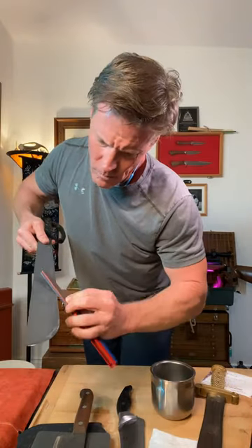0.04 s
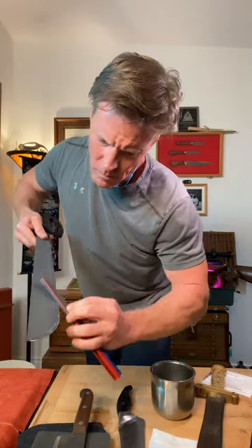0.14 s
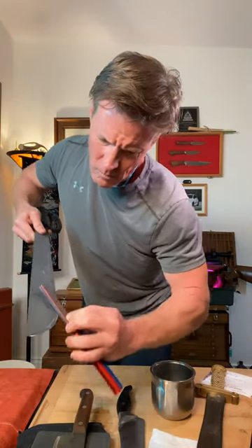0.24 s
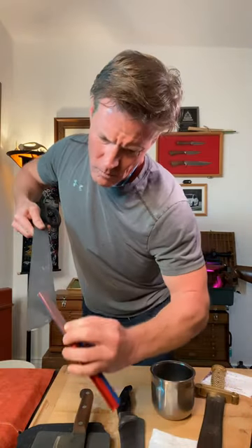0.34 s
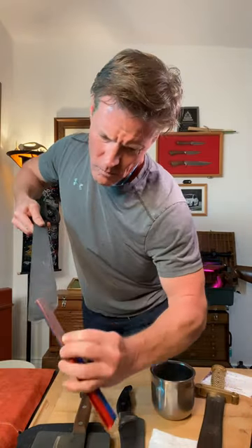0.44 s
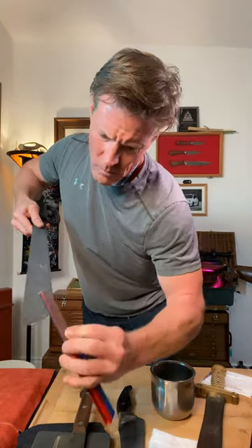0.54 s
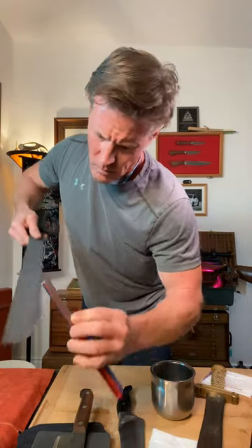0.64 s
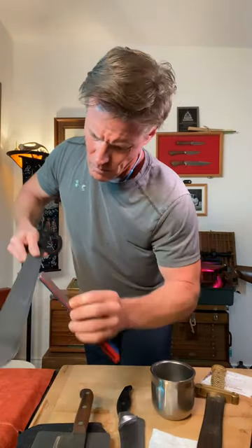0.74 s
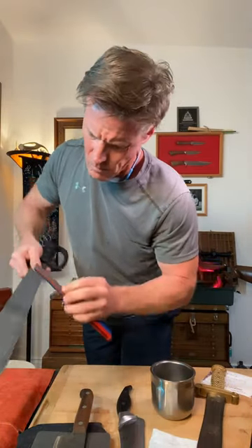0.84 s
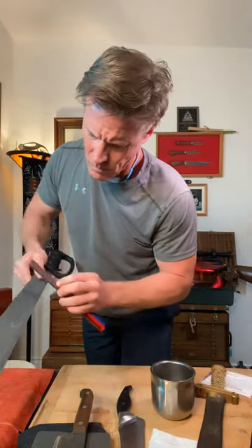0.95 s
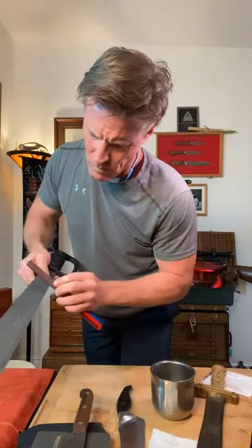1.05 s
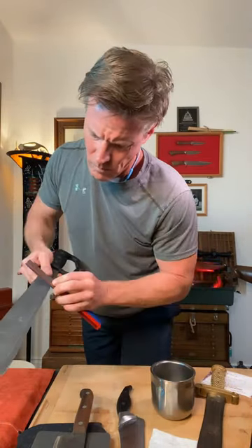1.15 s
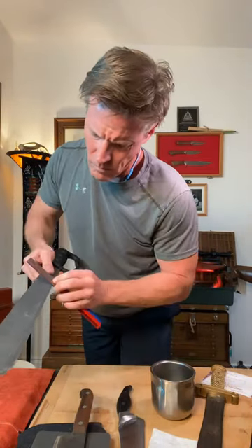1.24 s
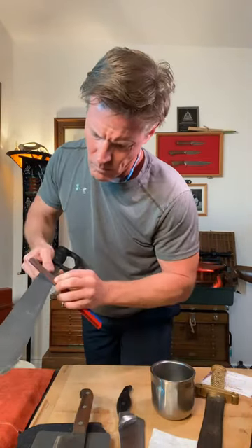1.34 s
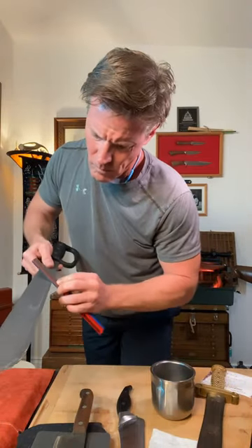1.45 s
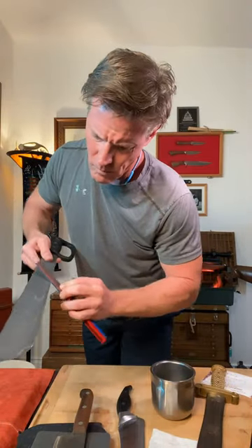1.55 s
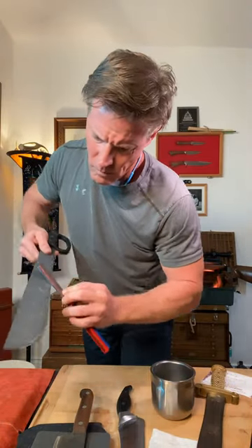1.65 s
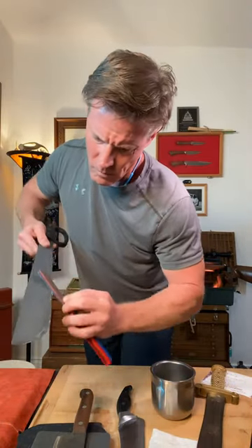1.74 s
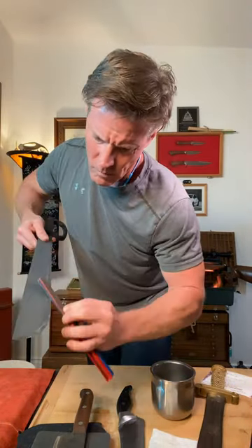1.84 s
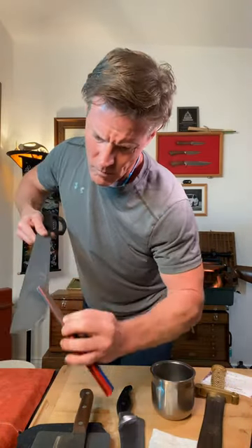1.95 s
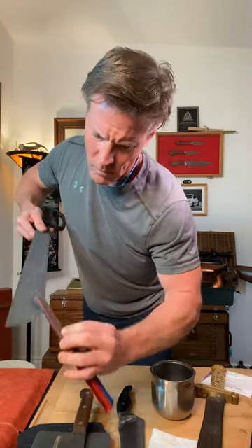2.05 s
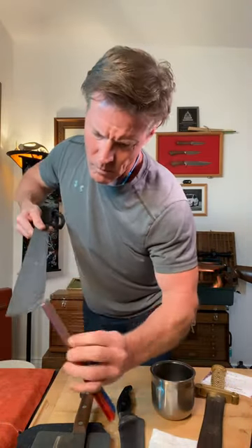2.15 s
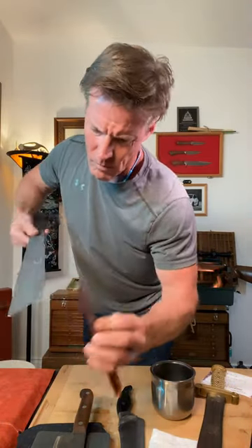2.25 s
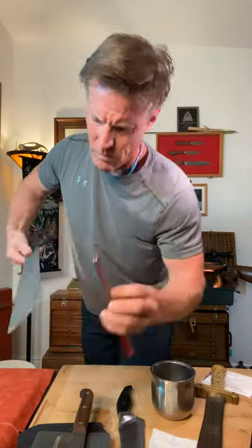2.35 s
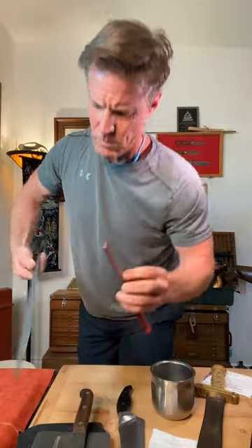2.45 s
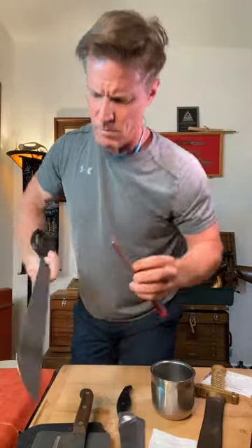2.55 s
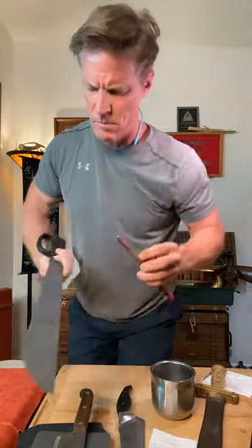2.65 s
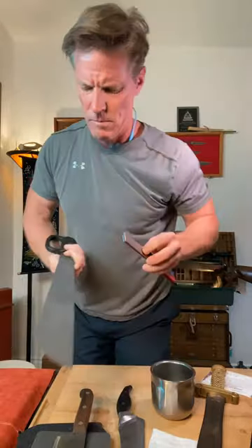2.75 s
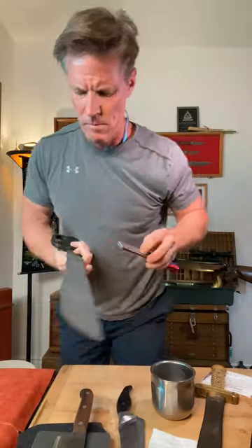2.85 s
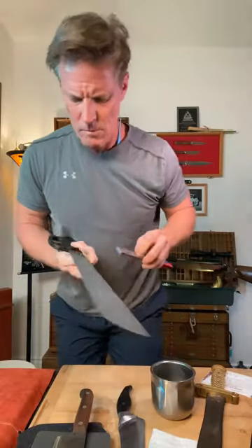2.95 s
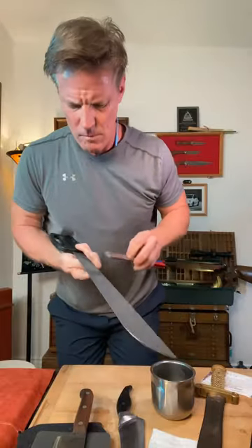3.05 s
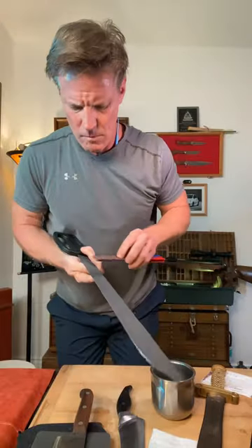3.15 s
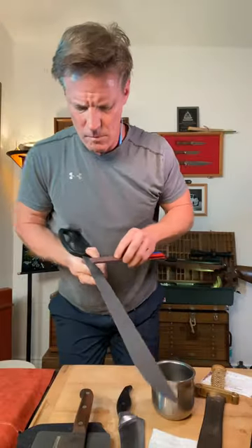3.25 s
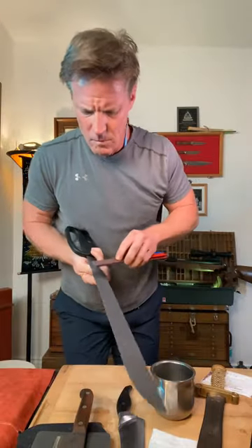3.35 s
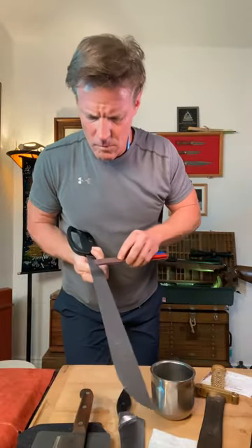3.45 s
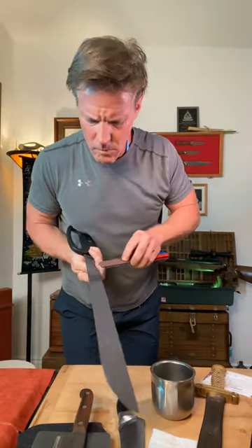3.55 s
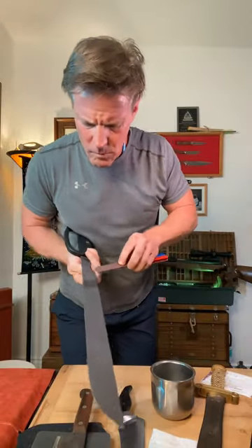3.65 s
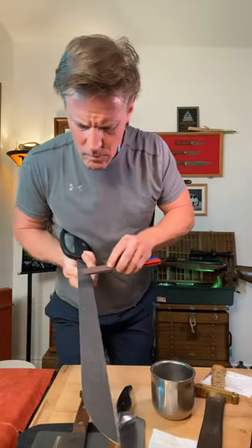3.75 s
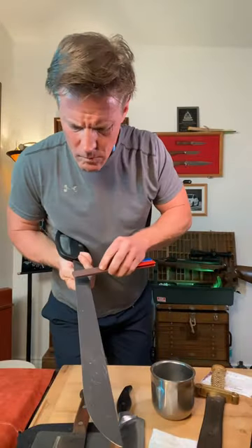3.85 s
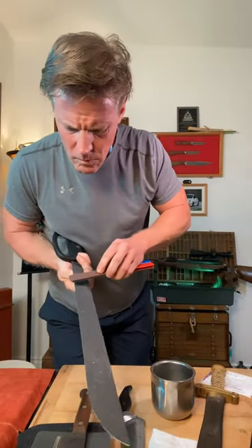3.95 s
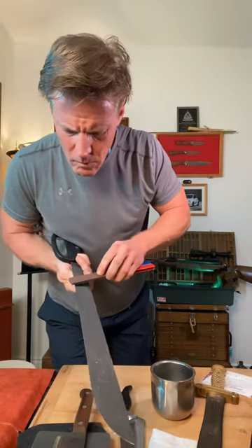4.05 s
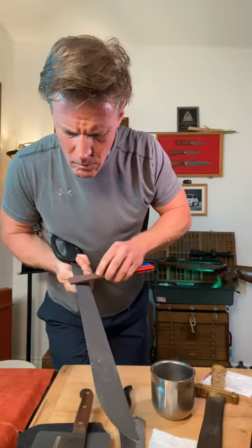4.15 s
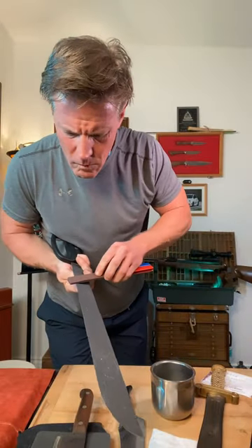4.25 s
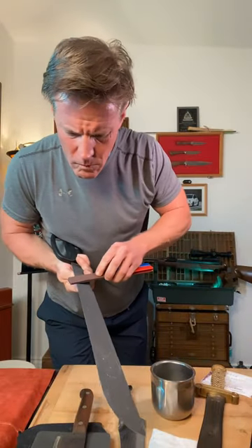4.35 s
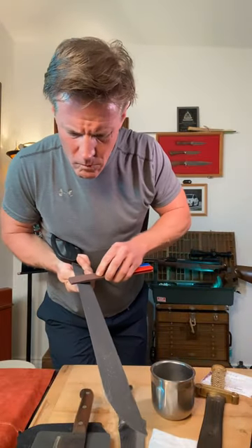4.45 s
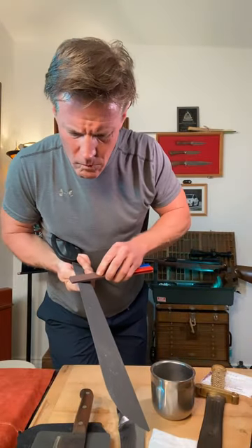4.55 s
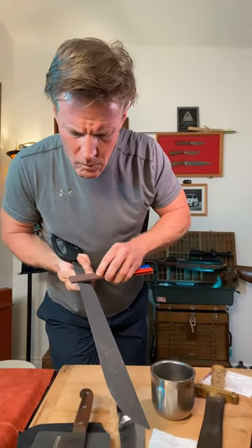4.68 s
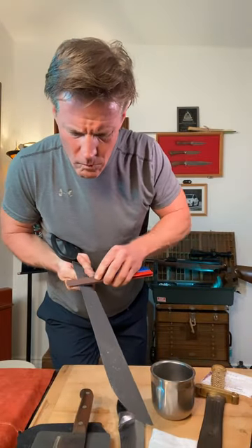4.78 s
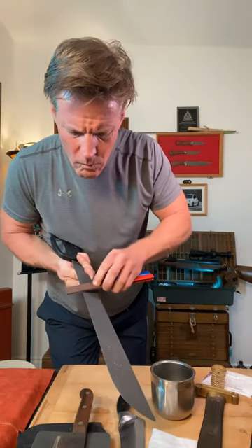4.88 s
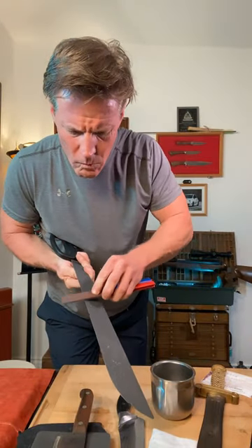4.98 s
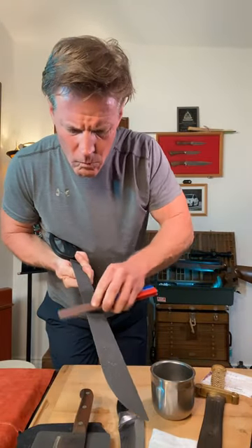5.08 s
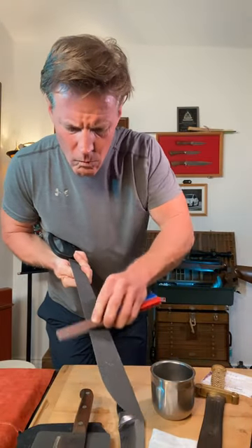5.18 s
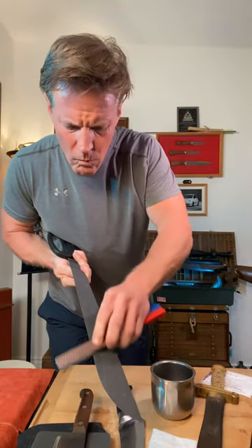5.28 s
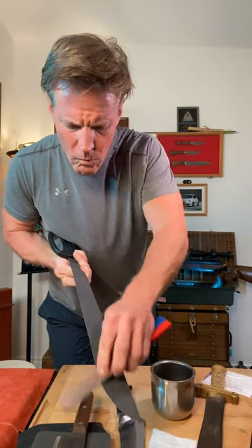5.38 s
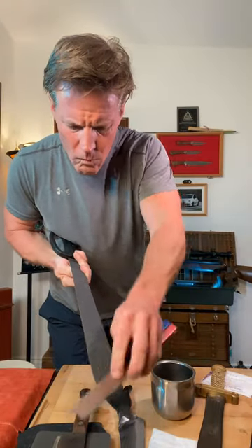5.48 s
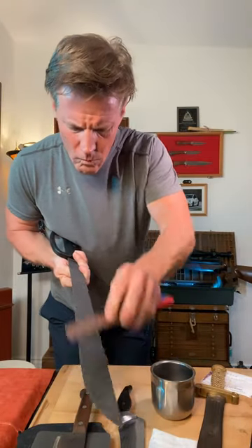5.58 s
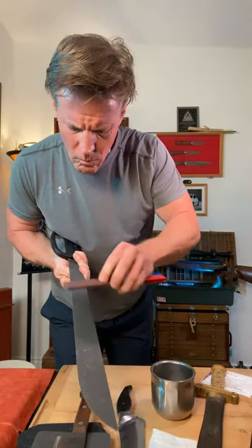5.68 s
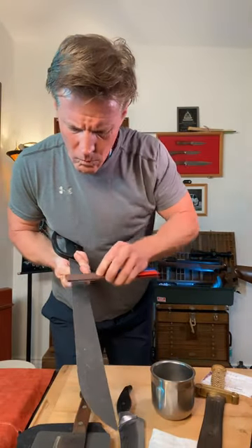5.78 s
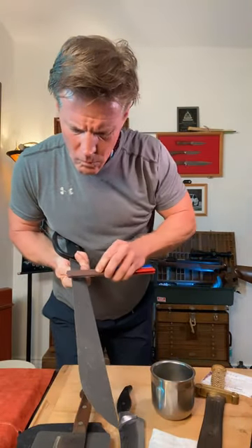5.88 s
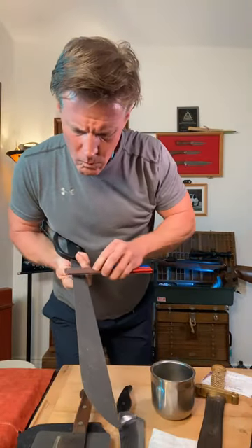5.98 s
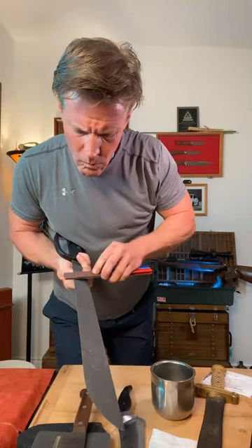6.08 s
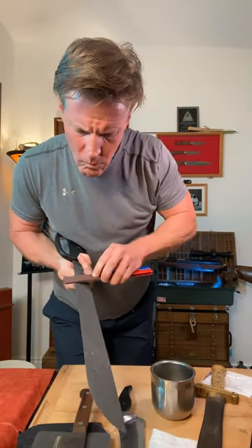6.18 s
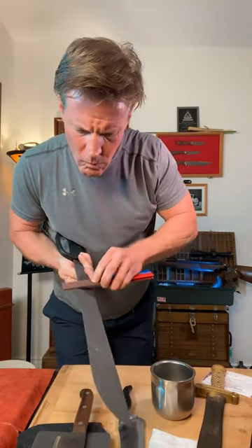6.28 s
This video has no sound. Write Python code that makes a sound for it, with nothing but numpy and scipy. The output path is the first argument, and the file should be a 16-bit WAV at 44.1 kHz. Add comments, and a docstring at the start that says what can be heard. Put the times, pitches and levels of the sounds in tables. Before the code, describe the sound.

Close to one microphone in a small room, a gritty stone rasps along a long steel blade, already mid-stroke. It runs off the tip with a faint high ring, then lands with a crack for a louder second stroke. The shirt rustles and the grip bumps softly as the blade is turned. A sharp knock follows, then a slower scrape that rings off, another hard knock, and the start of a last stroke.

```python
"""A diamond sharpening stone rasps along a long steel blade in a small room, close to one microphone.
We come in at mid-blade on the first of four strokes and leave early in the fourth.
Random grains drive the scrape and the blade's resonances; the stone lands with noise cracks and ringing
knocks, and decaying sines ring on when it runs off the tip. Between the two sets the blade is turned over,
with a filtered-noise rustle of shirt and soft bumps of the grip. Noise echoes and room tone lie behind."""
import sys
import numpy as np
from scipy import signal
from scipy.fft import rfft, irfft
from scipy.io import wavfile
from scipy.ndimage import map_coordinates

SR = 44100
rng = np.random.default_rng(int(sys.argv[2]) if len(sys.argv) > 2 else 0)


def bounce(signal):
    """Save signal as a 16-bit WAV file at the path given by the first command-line argument."""
    frames = np.transpose(np.atleast_2d(signal))
    limited = np.clip(frames, -1, 1)
    pcm = np.round(limited * 32767).astype(np.int16)
    wavfile.write(sys.argv[1], SR, pcm)


N = 278712
TIME = np.arange(N) / SR   # s


def from_db(db):
    """Decibels to gain."""
    return 10 ** (np.asarray(db) / 20)


def rms_one(x):
    """Scale to unit power."""
    return x / np.sqrt(np.mean(x ** 2) + 1e-20)


def during(start_s, end_s, rise_s, fall_s):
    """One from start to end, fading outside."""
    return np.clip(np.minimum((TIME - start_s) / rise_s, (end_s - TIME) / fall_s) + 1, 0, 1)


def coloured(x, spectrum):
    """Give a steady signal a spectrum; rms 1."""
    hz, db = np.transpose(spectrum)
    bins_hz = np.maximum(np.arange(N // 2 + 1) * SR / N, 1)
    gain_db = np.interp(np.log(bins_hz), np.log(hz), db, left=-100, right=-100)
    return rms_one(irfft(rfft(x) * from_db(gain_db), N))


def cut(x, hz, kind, order=2):
    """Causal low- or high-pass."""
    sos = signal.butter(order, min(hz, .45 * SR), kind, fs=SR, output="sos")
    return signal.sosfilt(sos, x + 1e-18)


def drift(rate):
    """Smooth chance with a spread of one, drawn afresh at `rate` points per second."""
    return rms_one(np.interp(TIME * rate, np.arange(N), rng.standard_normal(N)))


def ring(x, hz, t60_s):
    """A two-pole resonator: a unit click sets a decaying sine of height 1 ringing."""
    radius, turn = from_db(-60 / (t60_s * SR)), 2 * np.pi * hz / SR
    return signal.lfilter([0, np.sin(turn)], [1, -2 * radius * np.cos(turn), radius * radius], x + 1e-18)


def resonate(x, hz, width_hz):
    """A resonance whose centre may move, by smoothing around a turning phase; rms 1."""
    turn = np.exp(2j * np.pi * np.cumsum(hz * np.ones(N)) / SR)
    smooth = signal.lfilter([1], [1, -np.exp(-np.pi * width_hz / SR)], x / turn)
    return rms_one((smooth * turn).real)


def click(s):
    """A unit impulse at a given time."""
    return 1. * (np.arange(N) == round(s * SR))


# colour of the three parts of the scrape: broad rasp, low growl, high sizzle (hz, level_db)
RASP_COLOUR = [(1530, -40.5), (2600, -18), (3630, -3.5), (3910, -5.5), (4500, -2.5), (4890, -5), (5920, 1),
               (6740, 0.5), (7800, 2.5), (10500, -18), (13600, -49.5), (22000, -120)]
GROWL_COLOUR = [(240, -50.5), (400, -25), (571, -15), (710, -17), (1170, -9), (1410, -7.5), (1830, -4.5),
                (2280, -2), (3200, -6.5), (4160, -28), (7040, -120)]
SIZZLE_COLOUR = [(5760, -38), (9800, -3), (10800, -2.5), (11800, -6.5), (13500, -6), (14300, -13),
                 (15800, -22.5)]
# bending resonances of the blade: (ratio to the bending pitch, level_db in the growl, tip_gain_db)
BENDING_MODES = [(.39, -24, -1), (.55, -18.5, -0.5), (1, 0.5, -0.5)]
USUAL_FORCE_DB = -34
LIGHTEST_TOUCH_DB = -14.5   # re the usual force; below it the tone changes no more
# a light stroke growls and lets the blade sing, a hard one only rasps:
# dB re rasp at the usual force before the other trims, then dB lost per dB of force
GROWL_DB, GROWL_LOSS = -12.5, 0.73
SINGING_DB, SINGING_LOSS = -8, 0.31
SINGING_TIP_DB = 8.5   # the thin tip sings more
SIZZLE_GAIN = .15   # dB of sizzle gained per dB of force


def scrape(rasp_trim_db=-0.1, growl_trim_db=-4.0, sizzle_trim_db=-3.4, bend_damping=0.045,
           bend_patchy_db=5.0, bend_wander=0.027, body_hz=5200, body_share=0.42, body_db=5.5):
    """Streams of grains excite the broad rasp and the blade's resonances."""
    grains, bite = shifting_modes(grit()), grit()
    contact, force_db, tip, low_db, top_db, bend_hz, bend_db = stroke_controls()
    effort_db = np.maximum(force_db - USUAL_FORCE_DB, LIGHTEST_TOUCH_DB)
    low_db = low_db + GROWL_DB - GROWL_LOSS * effort_db

    singing = from_db(SINGING_DB - SINGING_LOSS * effort_db + SINGING_TIP_DB * tip)
    rasp = coloured(grains, RASP_COLOUR) + singing * held_blade(bite)
    rasp = rasp / np.sqrt(1 + singing ** 2)
    body_filter = signal.butter(3, min(body_hz, .45 * SR), fs=SR, output="sos")
    body = signal.sosfiltfilt(body_filter, rasp)
    # a hard stroke loses the lower half of the rasp along with the growl
    voiced = rasp + (from_db(body_db + body_share * low_db) - 1) * body

    growl = from_db(growl_trim_db) * coloured(grains, GROWL_COLOUR)
    for ratio, db, tip_db in BENDING_MODES:
        # the contact rocks, so each resonance wavers and comes in patches
        hz = ratio * bend_hz
        bend = resonate(bite, hz * (1 + bend_wander * drift(25)), bend_damping * np.mean(hz))
        bend_gain = from_db(db + bend_db + tip_db * tip + bend_patchy_db * drift(25))
        growl = growl + bend_gain * cut(bend, 910, "high")

    sizzle_gain = from_db(top_db + sizzle_trim_db + SIZZLE_GAIN * effort_db)
    sizzle = sizzle_gain * coloured(grains, SIZZLE_COLOUR)
    return contact * from_db(force_db) * (from_db(rasp_trim_db) * voiced + from_db(low_db) * growl + sizzle)


# how each stroke is laid on: (mid_blade_s when the stone passes mid-blade, to_tip_s from there to the tip,
# growl_db, tip_growl_db added at the tip, sizzle_db, end_hz and mid_hz bending pitch, bending_db)
STROKE_SHAPES = [(0.0, .45, -1, 0.5, -9, 2310, 2650, -5), (1.58, 0.42, -3.5, 3, -8, 2038, 2820, -7),
                 (5.15, .38, -.5, 2.5, -2.5, 2153, 3090, -2.5), (6.7, 0.55, -3, 0, -3.5, 2130, 2927, 1)]
# force of the hand, one curve for each stroke: (time_s, force_db)
HAND_FORCE = [
    [(0.0, -30.5), (0.068, -25), (0.072, -29.5), (0.172, -30.5), (0.246, -39.5), (0.266, -33), (0.354, -39),
     (0.432, -32), (0.46, -49)],
    [(1.32, -61), (1.346, -41.5), (1.438, -25.5), (1.54, -23), (1.544, -24.5), (1.668, -24.5),
     (1.688, -28.5), (1.818, -26.5), (2.12, -33)],
    [(4.665, -60), (4.683, -51), (4.829, -35), (4.857, -37.5), (5.175, -34), (5.229, -27.5), (5.331, -25.5),
     (5.407, -37.5), (5.42, -37.5)],
    [(6.13, -51), (6.2, -45), (6.264, -33.5), (6.32, -37)],
]
MID_BLADE_REACH = .42   # share of the way to the tip over which the bending pitch stays raised


def stroke_controls(fade_s=0.0064):
    """The stone travels from heel to tip; the bending pitch arches past mid-blade. One row per control."""
    controls = np.zeros((7, N))
    for force, shape in zip(HAND_FORCE, STROKE_SHAPES):
        mid_s, to_tip_s, growl_db, tip_growl_db, sizzle_db, end_hz, mid_hz, bend_db = shape
        start_s, end_s = force[0][0], force[-1][0]
        contact = during(start_s, end_s, fade_s, fade_s)
        force_db = np.interp(TIME, *np.transpose(force))
        place = (TIME - mid_s) / to_tip_s   # 0 at mid-blade, 1 at the tip
        tip = np.clip(place, 0, 1)
        low_db = growl_db + tip_growl_db * tip
        bend_hz = end_hz + (mid_hz - end_hz) * np.exp(-(place / MID_BLADE_REACH) ** 2)
        stroke = np.broadcast_arrays(contact, force_db, tip, low_db, sizzle_db, bend_hz, bend_db)
        controls = np.where(TIME >= start_s - fade_s, stroke, controls)
    return controls


def grit(per_s=15000, size_db=2.0, judder_db=1.23, judder_rate=220, sway_db=0.14, sway_rate=50):
    """Small grains catch at random, in clumps as the rubbing judders: sparse impulses of uneven size."""
    spread_db = size_db * np.minimum(rng.exponential(1, N), 5)
    sizes = from_db(spread_db) * rng.standard_normal(N)
    caught = rng.random(N) < per_s / SR
    clumps = from_db(judder_db * drift(judder_rate) + sway_db * drift(sway_rate))
    return sizes * caught * clumps


def shifting_modes(x, depth_db=5.0, spacing_hz=110, rate=20, flutter_db=4.5, flutter_rate=110):
    """The blade's crowd of overlapping modes rises and sinks as the contact point travels."""
    hz, s, frames = signal.stft(x, SR, nperseg=512, noverlap=384)
    chance = rng.standard_normal((2, 600, 1600))
    gain_db = 0
    # one slow field of chance and one fast, read across pitch and time
    for field, db, per_s in zip(chance, (depth_db, flutter_db), (rate, flutter_rate)):
        places = np.meshgrid(hz / spacing_hz, s * per_s, indexing="ij")
        gain_db = gain_db + db * map_coordinates(field, places, order=1, mode="wrap")
    return signal.istft(frames * from_db(gain_db), SR, nperseg=512, noverlap=384)[1][:N]


# blade resonances while the stone bears on it: (pitch_hz, width_hz before narrowing, level_db)
HELD_BLADE_MODES = [(4220, 120, -4), (5075, 140, 4.5), (5710, 57, 8.5), (6340, 62, -4.5), (6290, 70, 4.5),
                    (7040, 100, -4), (7300, 280, -17.5), (7990, 39, 6), (8700, 70, -7), (8800, 70, -14.5),
                    (9100, 31, -9.5), (9560, 100, -11), (10500, 52, -12), (11000, 100, -4.5),
                    (13100, 63, -7), (13620, 77, -8.5)]


def held_blade(grains, wander=0.0079, patchy_db=6.5, narrowing=0.3):
    """The travelling contact detunes each mode and feeds it unevenly."""
    out = 0
    for hz, width_hz, db in HELD_BLADE_MODES:
        gain = from_db(db + patchy_db * drift(25)) * np.sqrt(width_hz)
        out = out + gain * resonate(grains, hz * (1 + wander * drift(12)), narrowing * width_hz)
    return rms_one(out)


# one high tone stands out briefly, as a squeak of the edge or a swell in the blade's ring:
# (peak_s, pitch_hz, level_db, length_s)
SQUEAK_TONES = [(0.019, 6540, -25.5, 0.0091), (.063, 6470, -29.5, 0.0041), (.272, 5750, -30.5, 0.0048),
                (0.446, 6900, -36.5, .015), (0.57, 5593, -51, .025), (0.66, 6304, -58, 0.036),
                (1.515, 4600, -36.5, 0.0095), (1.535, 8470, -18, .003), (1.536, 5900, -36, .003),
                (1.625, 4660, -23, 0.0046), (1.649, 6080, -22.5, 0.0036), (1.735, 4370, -31.5, 0.0058),
                (2.29, 6300, -52, .02), (5.276, 7830, -24, 0.0051)]


def squeaks(waver=0.0025):
    """One resonance swells and fades; the short ones are stick and slip locking on to it."""
    out = 0
    for s, hz, db, length_s in SQUEAK_TONES:
        phase = 2 * np.pi * np.cumsum(hz * (1 + waver * drift(300))) / SR
        swell = np.exp(-.5 * ((TIME - s) / length_s) ** 2)
        out = out + from_db(db) * swell * np.sin(phase)
    return out


# the flexing blade judders under the stone and groans:
# (peak_s, pitch_hz, glide_hz_per_s, level_db before the common trim, length_s)
GROAN_TONES = [(0.135, 2210, -1, -43, 0.038), (0.358, 1173, -300, -52.5, 0.039),
               (0.41, 2330, 800, -52, 0.022), (1.723, 1220, 602, -55, .04),
               (1.892, 1184, -200, -52.5, 0.045), (1.965, 1670, 0, -49, 0.047),
               (2.029, 1050, 1300, -49.5, .055), (4.796, 1254, 700, -57, .05), (4.847, 830, -600, -61, .04),
               (5.147, 3114, 0, -43, 0.038), (5.301, 2747, 0, -38.5, 0.039)]


def groans(width_hz=30, trim_db=-2.5):
    """The grit drives one gliding bending resonance, which swells and fades."""
    bite, out = grit(), 0
    for s, hz, glide, db, length_s in GROAN_TONES:
        age = np.clip(TIME - s, -.25, .25)
        pitch_hz = hz + glide * age
        swell = np.exp(-.5 * (age / length_s) ** 2)
        narrow = resonate(bite, pitch_hz, width_hz)
        tone = resonate(narrow, pitch_hz, 10 * width_hz) * swell
        out = out + from_db(db + trim_db) * np.sqrt(np.mean(swell ** 2)) * rms_one(tone)
    return out


# free blade: (pitch_hz, t60_s, then level_db at the first, second and third release)
FREE_BLADE_MODES = [(5010, 0.47, -22, -0.5, -1), (5593, 0.45, 0, -8, -11), (6304, 0.43, 1.5, -0.5, -2),
                    (6960, 0.43, -1, -11, -11.5), (7634, 0.34, 0.5, -10.5, -7),
                    (8320, 0.31, -10, -34, -17.5), (9005, .34, -10, -35, -19), (10200, 0.24, -17, -26, -20),
                    (10990, .24, -10, -27, -21), (11620, 0.206, -30, -12, -25.5),
                    (13020, 0.25, -13, -12.5, -10), (13810, 0.23, -15, -21, -10.5),
                    (14810, .26, -19, -24, -18)]
# the stone runs off the tip: (release_s, ring_db)
TIP_RELEASES = [(.45, -43.5), (2.117, -37.5), (5.41, -36)]


def free_blade(swell_s=.018, waver_db=2.5, waver_rate=25):
    """As the stone leaves, undamped modes swell and ring out, wavering as the blade moves in the hand."""
    out = np.zeros(N)
    for hz, t60_s, *strengths_db in FREE_BLADE_MODES:
        envelope = 0
        for (s, ring_db), db in zip(TIP_RELEASES, strengths_db):
            age = TIME - s
            slope = np.minimum(age / swell_s, -np.log(1000) * age / t60_s)   # rises, then decays
            envelope = envelope + from_db(ring_db + db) * np.exp(np.maximum(slope, -20))
        waver = from_db(waver_db * drift(waver_rate))
        out += envelope * waver * np.sin(2 * np.pi * (hz * TIME + rng.random()))
    return out


# the stone lands on the edge: (start_s, level_db, hardness_hz, stone_ring_db, ring_pitch_ratio)
STONE_LANDINGS = [(0.713, -45, 6000, -8, 0.95), (1.22, -24.5, 6000, -10, 0.87),
                  (1.222, -29.5, 4500, -3, .9), (4.2271, -23.5, 5660, -1, 1),
                  (6.0966, -19.5, 11000, -1.5, 0.91)]
# stone and edge in contact: (pitch_hz before the landing's ratio, level_db, t60_s)
STONE_MODES = [(520, -32.5, .03), (1270, -24, 0.018), (2287, -10, 0.074), (3046, -18, 0.018),
               (4116, -8.5, .026), (4450, -13, .02), (5170, -12.5, 0.021), (6000, -10, 0.016),
               (6900, -5, .014), (7940, -10, .015)]


def knocks(crack_t60_s=0.035, crack_db=-5.0, low_hz=1450, settle_s=0.012):
    """A hard crack, and the ring of the stone until it settles on the edge; returned apart."""
    cracks, rings = 0, 0
    for s, db, hard_hz, ring_db, ratio in STONE_LANDINGS:
        age, touch = np.clip(TIME - s, 0, .1), click(s)
        crack = rng.standard_normal(N) * (TIME >= s) * from_db(crack_db - 60 * age / crack_t60_s)
        body = 0
        for k, (hz, mode_db, t60_s) in enumerate(STONE_MODES):
            strength = (-1) ** k * from_db(mode_db + rng.normal(0, 1.4))
            body = body + strength * ring(touch, ratio * hz, t60_s)
        loose = 1 / (1 + (age / settle_s) ** 8)
        cracks = cracks + from_db(db) * cut(cut(crack, low_hz, "high"), hard_hz, "low")
        rings = rings + from_db(db + ring_db) * cut(body * loose, hard_hz, "low")
    return cracks, rings


# colour of the airy swish of cloth, its low rub, and the hiss of the sleeve: (hz, level_db)
SWISH_COLOUR = [(760, -36), (1300, -10.5), (2500, -2), (2920, -2), (4140, -3), (4940, -6), (7590, -10.5),
                (9000, -16.5), (11700, -38), (19800, -120)]
RUB_COLOUR = [(110, -35.5), (180, -23), (322, -4), (474, -10.5), (605, -3), (1700, -9), (2210, -21),
              (3740, -120)]
SLEEVE_COLOUR = [(1180, -28), (2000, -2.5), (3640, -6), (7230, -1), (8440, -6), (11500, -6), (15500, -17)]
# the shirt swishes with each move of an arm: (peak_s, level_db before the cloth trims, rise_s)
ARM_SWISHES = [(2.28, -64, 0.026), (2.79, -53, 0.033), (2.985, -52, .045), (3.229, -51, 0.019),
               (3.42, -63.5, .035), (3.595, -61, .012), (3.71, -66, .03), (3.835, -57, .014),
               (3.975, -56, 0.033)]
# the blade is turned over, and the sleeve slides along the body: (start_s, end_s)
TURNING_SPAN = (2.49, 3.92)
TURNING_RISE_S, TURNING_FALL_S = 0.32, 0.35
SWISH_T60_S = 0.35
SHIRT_DB = -66   # steady rustle while the arms move, before the cloth trims
SLEEVE_DB, SLEEVE_SAG_DB_PER_S = -64.5, 3.5   # level at the start of the turn, and its fall
SLEEVE_FOLLOWS = 0.27   # share of the swing of the swishes, in dB


def shirt(swish_trim_db=-1.0, rub_trim_db=-5.0, rub_follows=0.78):
    """Cloth fibres brush past each other: a steady slide, and swishes that swell and die away."""
    moving = during(*TURNING_SPAN, TURNING_RISE_S, TURNING_FALL_S)
    power = (from_db(SHIRT_DB) * moving) ** 2
    for s, db, rise_s in ARM_SWISHES:
        swell = np.exp(-(np.minimum(TIME - s, 0) / rise_s) ** 2)
        dying = from_db(db - 60 * np.maximum(TIME - s, 0) / SWISH_T60_S)
        power = power + (swell * dying) ** 2
    speed = np.sqrt(power) / from_db(SHIRT_DB)   # 1 in the steady slide

    fibres = grit(per_s=13000, size_db=-2.5, judder_db=0.9, judder_rate=120, sway_db=0.5, sway_rate=10)
    swish = from_db(swish_trim_db) * speed * coloured(fibres, SWISH_COLOUR)
    rub = from_db(rub_trim_db) * speed ** rub_follows * coloured(fibres, RUB_COLOUR)
    sleeve_level = from_db(SLEEVE_DB - SLEEVE_SAG_DB_PER_S * (TIME - TURNING_SPAN[0]))
    sleeve_swing = moving * np.maximum(speed, 1) ** SLEEVE_FOLLOWS
    sleeve = sleeve_swing * sleeve_level * coloured(rng.standard_normal(N), SLEEVE_COLOUR)
    return from_db(SHIRT_DB) * (swish + rub) + sleeve


# the grip shifts and scuffs: (start_s, level_db, pitch_hz, width_hz, t60_s)
GRIP_BUMPS = [(2.765, -55, 353, 350, .2), (3.197, -49, 332, 200, 0.094), (3.198, -49, 2380, 900, 0.28),
              (3.199, -55, 3680, 2400, 0.28), (3.3444, -35.5, 740, 485, 0.013), (3.581, -56, 316, 220, 0.3),
              (3.581, -51.5, 1330, 1100, 0.15), (3.92, -53, 520, 603, 0.15), (3.919, -54, 2680, 2580, 0.46)]


def handling():
    """The handle bumps and scuffs softly in the hand: dying bursts of band-passed noise."""
    out = 0
    for s, db, hz, width_hz, t60_s in GRIP_BUMPS:
        edges_hz = [max(hz - width_hz / 2, 60), hz + width_hz / 2]
        band = signal.butter(2, edges_hz, "band", fs=SR, output="sos")
        age = np.clip(TIME - s, 0, 1)
        fading = np.minimum(age / 0.00067, 1) * from_db(db - 60 * age / t60_s)
        noise = signal.sosfilt(band, rng.standard_normal(N))
        out = out + np.std(fading) * rms_one(noise * fading)
    return out


def room(x, t60_s=0.42, treble_t60_s=0.32, split_hz=7500, first_echo_s=0.0018):
    """Dense reflections as decaying noise; the treble dies sooner."""
    age, echoes = TIME[:SR], rng.standard_normal(SR)
    dull = cut(echoes, split_hz, "low", order=1)
    bright = echoes - dull
    tail = dull * from_db(-60 * age / t60_s) + bright * from_db(-60 * age / treble_t60_s)
    tail = tail * (age > first_echo_s)
    return signal.fftconvolve(x, tail / np.sqrt(np.sum(tail ** 2)))[:N]


# colour of the room tone: (hz, level_db)
AIR_COLOUR = [(15, -37), (25, -13), (86, -4.5), (137, -5), (342, -14), (371, -12), (436, -15.5),
              (513, -14.5), (690, -18.5), (879, -18.5), (1390, -26), (1590, -24.5), (1870, -26.5),
              (11400, -32.5), (15800, -42.5)]


def room_tone(level_db=-66):
    """The still air of the room: steady coloured noise, its deepest rumble cut away (level before the cut)."""
    air = coloured(rng.standard_normal(N), AIR_COLOUR)
    return from_db(level_db) * cut(air, 42, "high", order=4)


def scene(direct_db=-2.0, room_db=-9.0, crack_room_db=-3.5, ring_room_db=-9.0, blade_room_db=-13.0):
    """Everything reaches one microphone, the same in both channels."""
    rubbing = scrape() + squeaks() + groans() + shirt() + handling()
    blade = free_blade()
    cracks, rings = knocks()
    to_room = from_db(room_db) * rubbing + from_db(blade_room_db) * blade
    to_room = to_room + from_db(crack_room_db) * cracks + from_db(ring_room_db) * rings
    direct = from_db(direct_db) * rubbing + cracks + rings + blade
    mono = direct + room(to_room) + room_tone()
    return np.stack([mono, mono])


def record(dry, cutoff_hz=15700):
    """The top is cut steeply by an elliptic low-pass."""
    return signal.sosfilt(signal.ellip(10, .1, 80, cutoff_hz, fs=SR, output="sos"), dry)


dry = scene()
out = record(dry)
bounce(out)
```